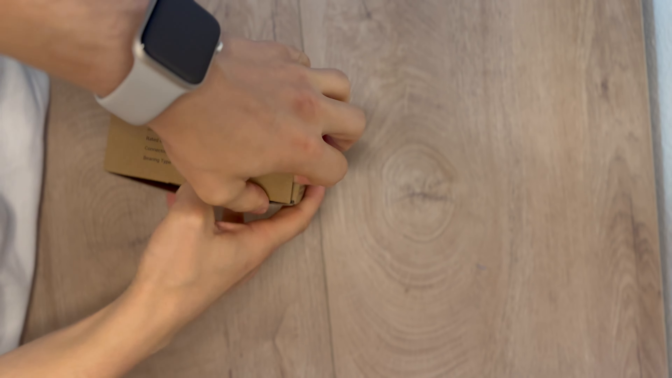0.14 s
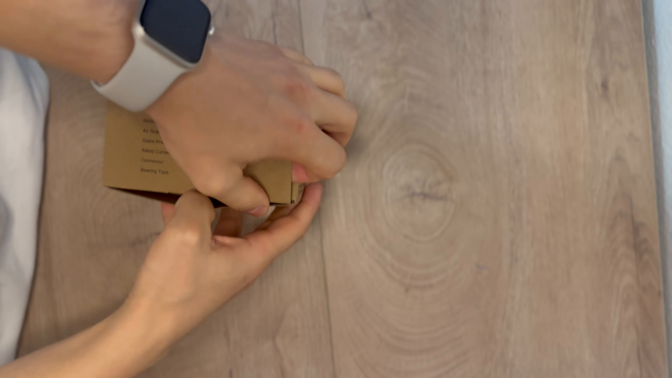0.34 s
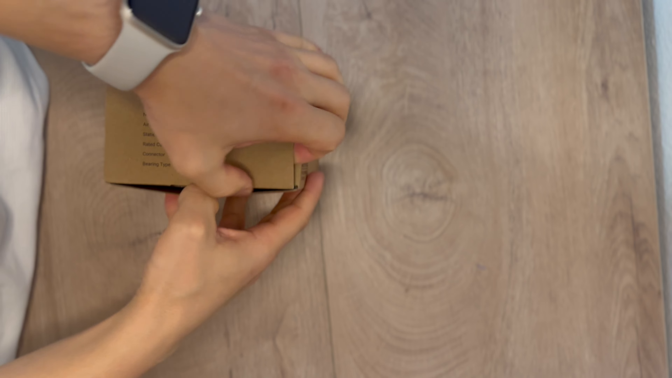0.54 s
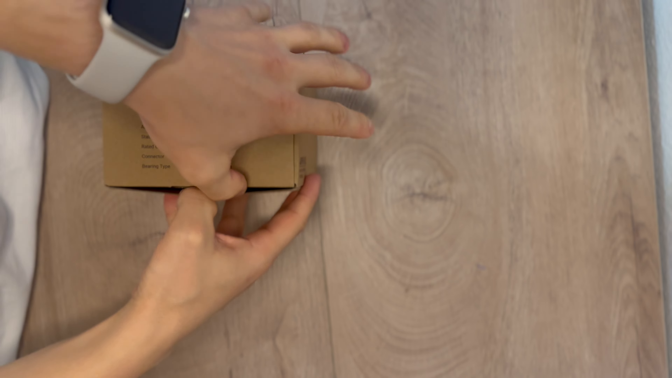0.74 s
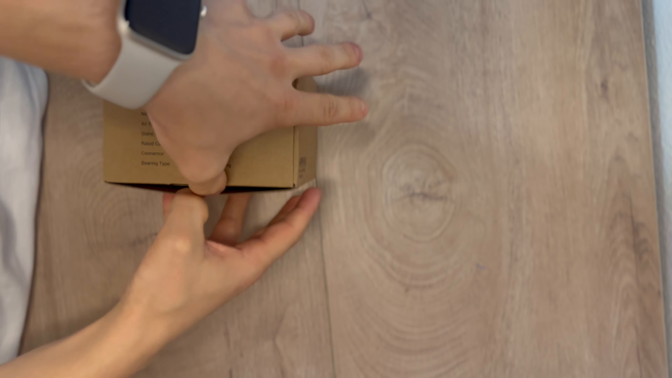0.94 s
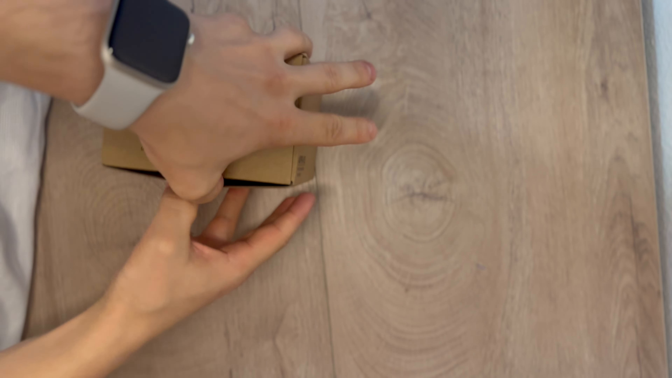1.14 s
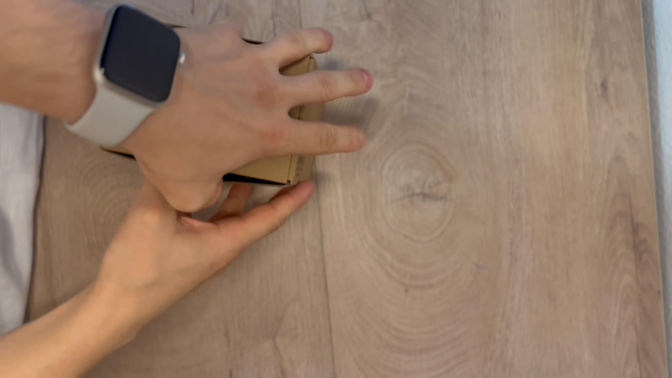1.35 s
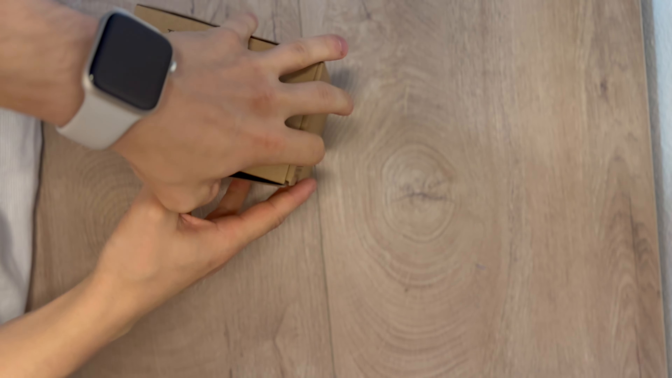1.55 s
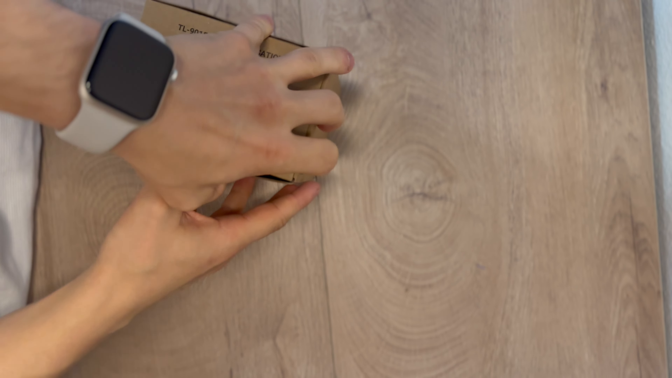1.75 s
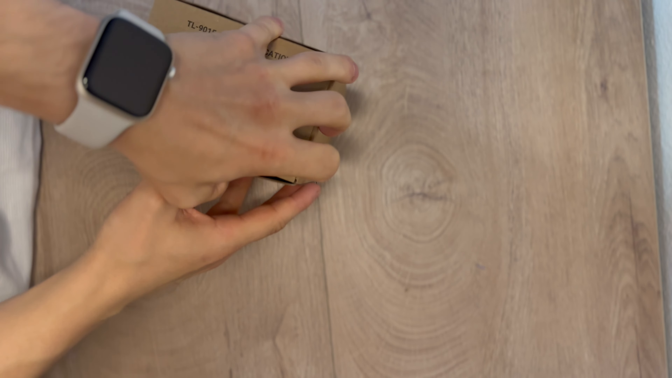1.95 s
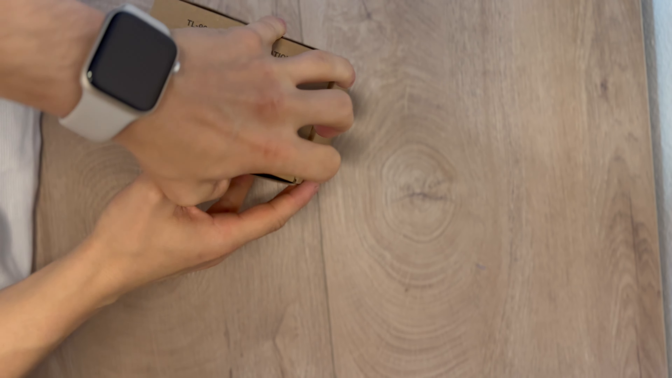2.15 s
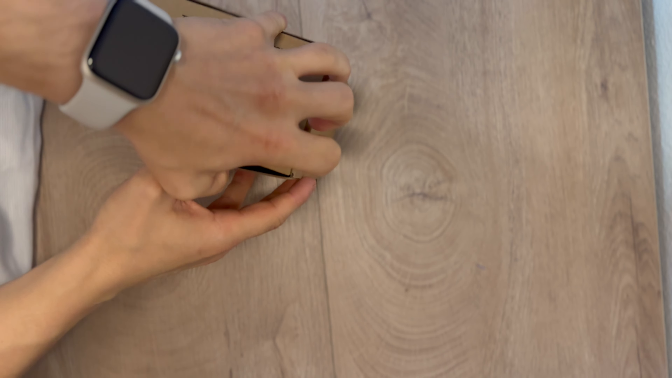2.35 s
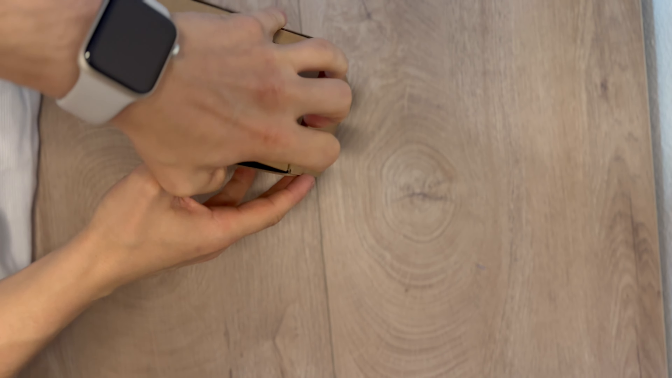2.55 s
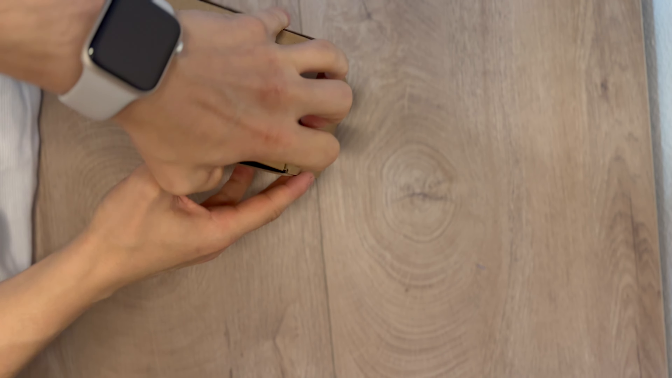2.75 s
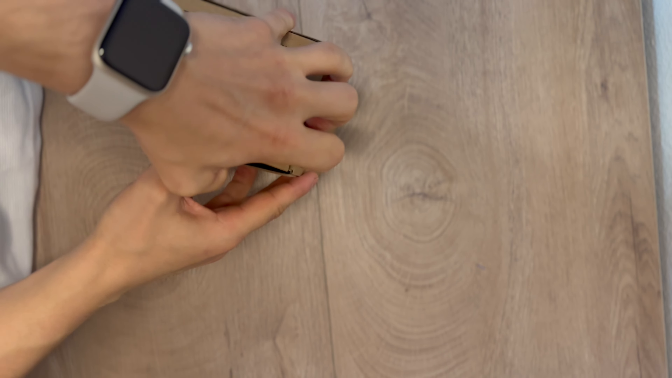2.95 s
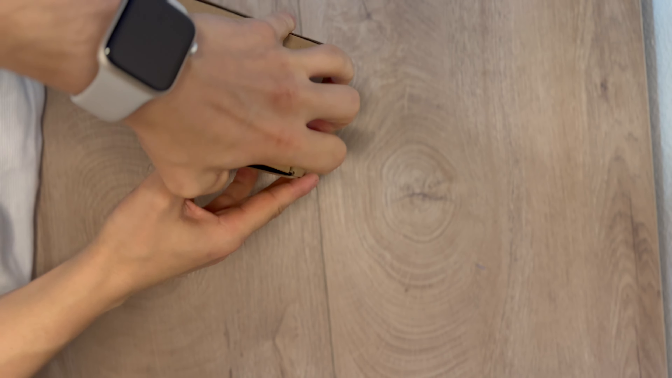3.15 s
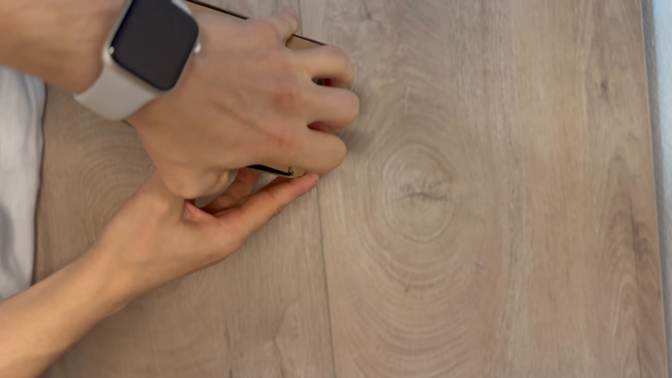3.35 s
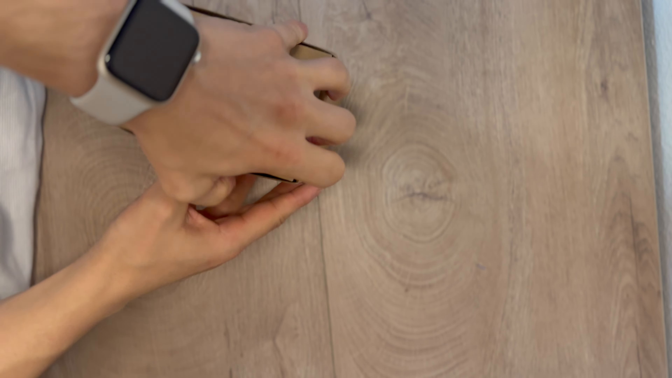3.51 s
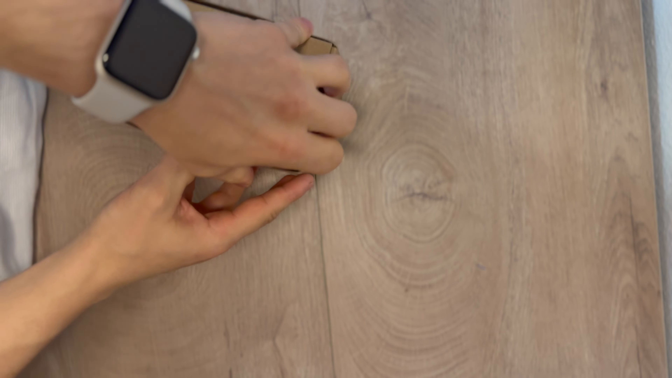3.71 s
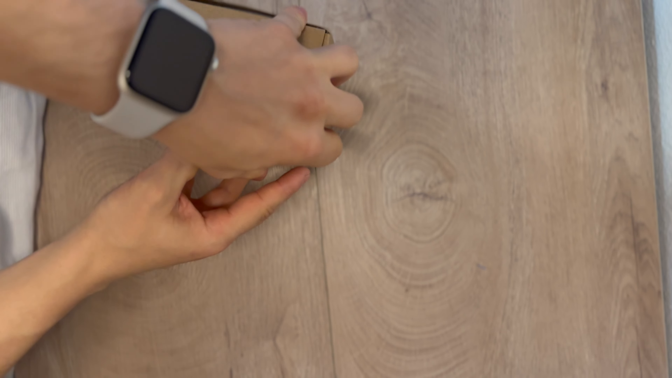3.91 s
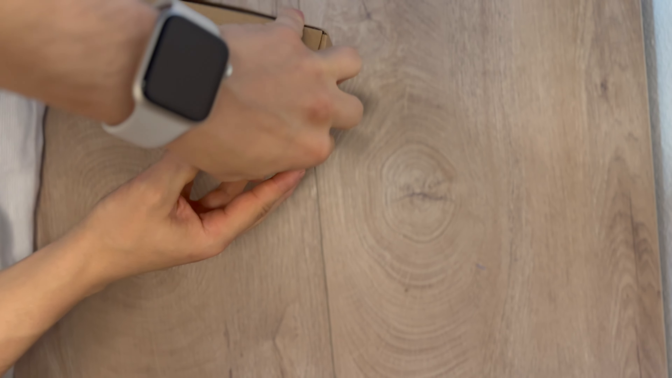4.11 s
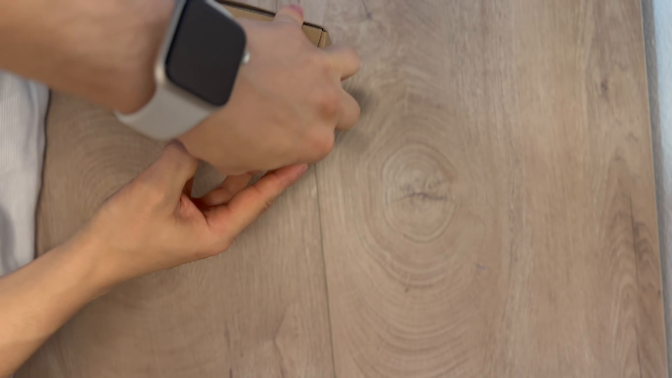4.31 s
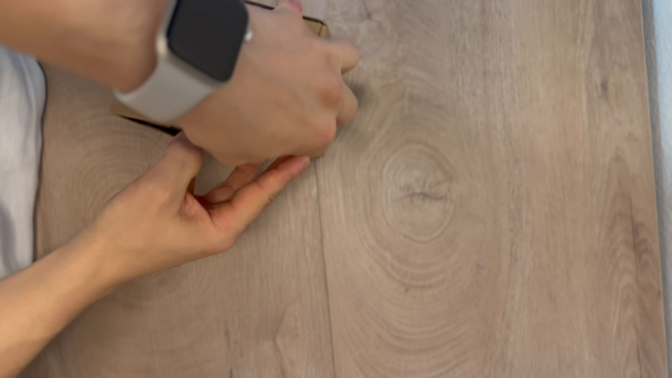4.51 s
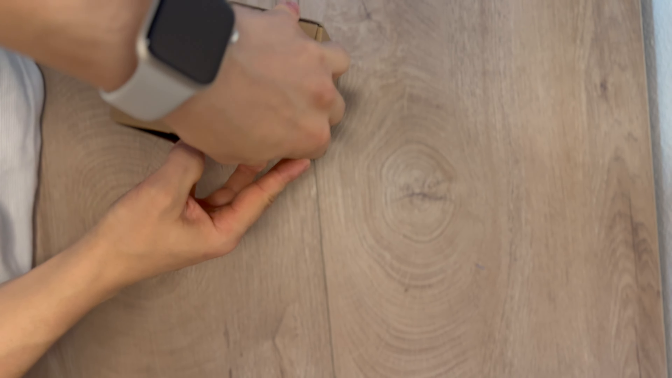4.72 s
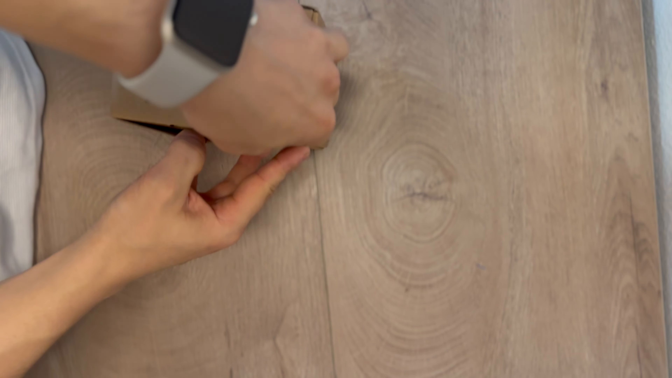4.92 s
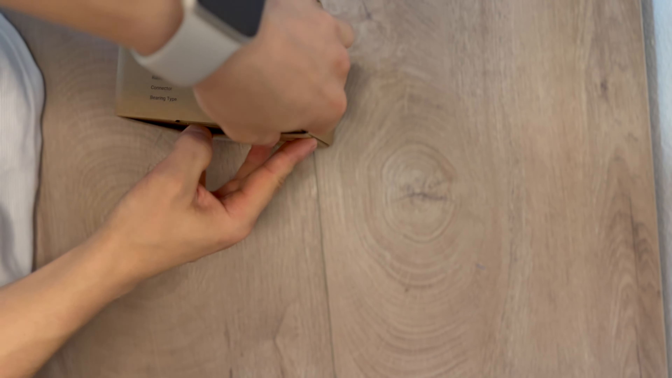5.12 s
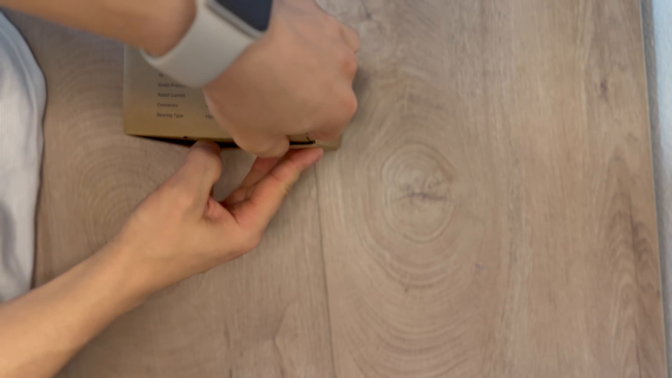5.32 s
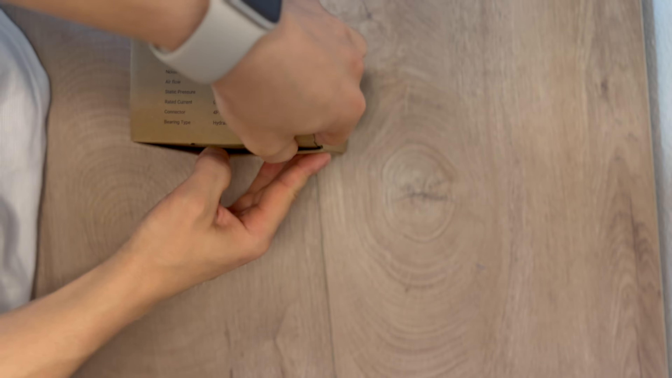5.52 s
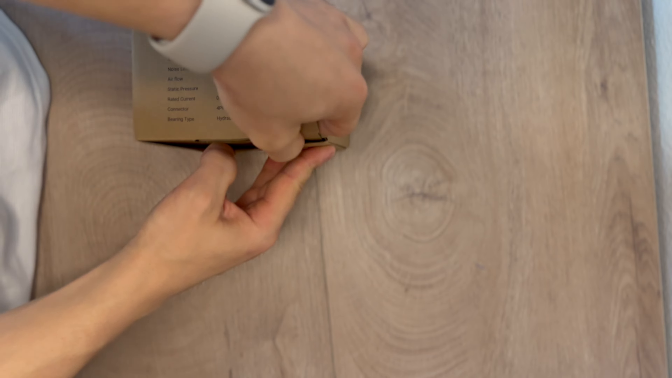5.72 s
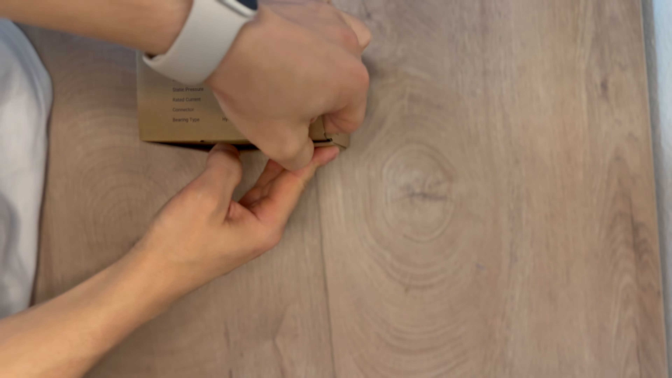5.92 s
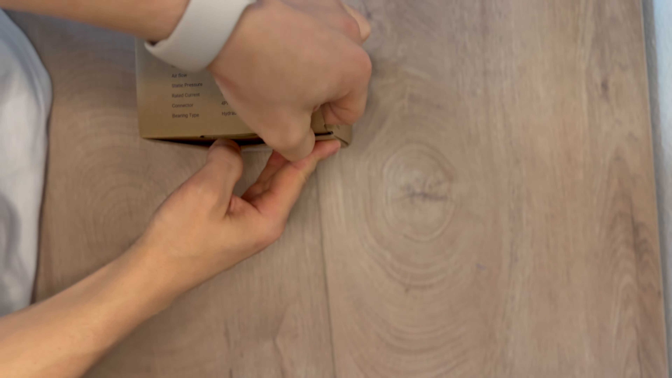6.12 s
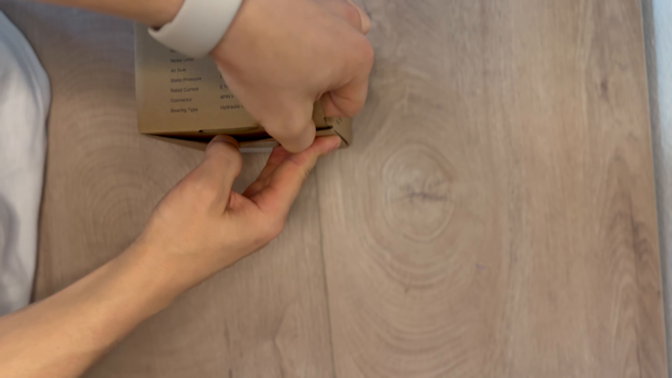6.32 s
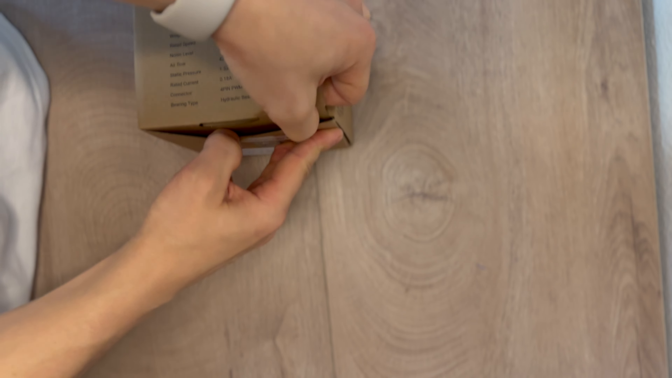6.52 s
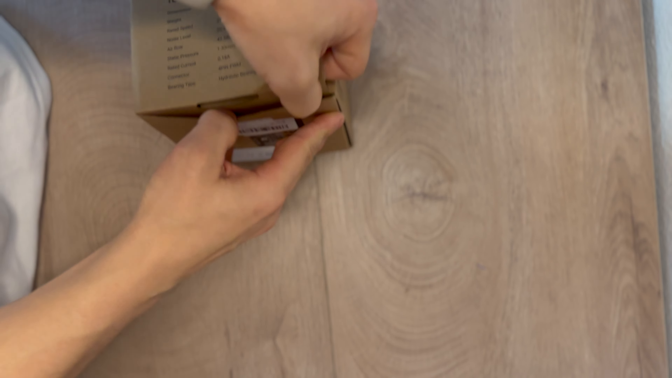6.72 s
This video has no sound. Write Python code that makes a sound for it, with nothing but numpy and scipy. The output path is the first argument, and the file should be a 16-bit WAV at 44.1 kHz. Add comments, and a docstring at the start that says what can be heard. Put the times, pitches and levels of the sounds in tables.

```python
"""Fingertips stroke a small cardboard box on a table and pick at its flap throughout, close to a pair of microphone ports.
Paper fibres catching make the rub and drag; bursts of breaking fibres make snaps, taps and nail ticks.
Fingertips stick and slip in chirping jerks, the flap groans, nails swish over the card, and pushes thump the box.
Near the end the flap drags free. A small live room answers with near echoes, a diffuse tail and a bass boom."""
import sys
import numpy as np
from scipy import signal
from scipy.fft import rfft, irfft, next_fast_len
from scipy.io import wavfile

SR = 44100
rng = np.random.default_rng(int(sys.argv[2]) if len(sys.argv) > 2 else 0)


def dump(signal):
    """Clip the signal to [-1, 1] and save it as 16-bit WAV at the path in sys.argv[1]."""
    limited = np.clip(np.atleast_2d(signal).T, -1, 1)
    pcm = np.round(limited * 32767).astype(np.int16)
    wavfile.write(sys.argv[1], SR, pcm)


N = 302557
TIME = np.arange(N) / SR
SIZE = next_fast_len(N + SR)  # transform length, with a second to spare for tails
HZ = np.fft.rfftfreq(SIZE, 1 / SR)

# card edges snapping past a nail: [t/s, crack level/dB, panel knock against crack/dB, edge tick against crack/dB,
# top treble of the tick/dB, length/s, ring of the struck spot f/Hz]
SNAPS = [(0.267, -19, 0.5, -1.5, 6, 0.0037, 1980), (0.3822, -29.5, 1.5, 4, 4, 0.0048, 2640),
         (0.3906, -29, 2.5, 4.5, 6, 0.0036, 1930), (0.562, -38.5, 2.5, 1, 4, 0.0033, 1260),
         (0.604, -32, 1.5, -2, 2, 0.0097, 1420), (0.624, -27, -11, -7, 1, 0.015, 1290),
         (0.6345, -22, -9, 2, 7, 0.0043, 3160), (1.415, -29.5, -11, -5, -1, 0.003, 2520),
         (1.661, -33.5, -1, -10, -1, 0.00086, 1780), (1.975, -38.5, -1, -2.5, -3, 0.0068, 1380),
         (2.44, -41, 0.5, 0, -2, 0.0038, 1440), (2.9813, -17, -12, -8, -7, 0.0025, 2000),
         (3.043, -27.5, -6.5, -5.5, 0, 0.0028, 1950), (3.0588, -27, -8, -5, -8, 0.0016, 2000),
         (3.1537, -24, -10, -13.5, -14, 0.0029, 1900), (3.206, -35, 2, -4, -8, 0.004, 1770),
         (3.362, -34.5, -5, 1.5, 4, 0.004, 2370), (3.394, -36, -7, -12, 7, 0.0021, 2500),
         (3.4127, -34, -14, -3.5, 0, 0.0055, 2460), (3.5355, -17, -16, -3, 7.5, 0.0057, 1730),
         (3.541, -18, -18, -3.5, -5, 0.0065, 1400), (4.017, -34.5, 6.5, -5.5, -3, 0.013, 2370),
         (4.529, -39.5, 0.5, -6, -8.5, 0.0027, 1890), (4.643, -37, 1, -7.5, -4, 0.0038, 1950),
         (4.857, -40, -16, 11.5, 3, 0.0015, 2030), (4.899, -27, -17, 3, 5.5, 0.0013, 1900),
         (5.177, -22, -1, 1, 1.5, 0.0047, 2130), (5.4259, -33.5, -0.5, -7, 3, 0.0027, 2000),
         (5.632, -37, -13.5, 7, 4.5, 0.0046, 1930), (6.3345, -31, -2.5, 9.5, 3, 0.0014, 2300),
         (6.3359, -24, -1, 7.5, 7.5, 0.0026, 2380), (6.361, -24.5, -2, 3, 8, 0.0033, 3020),
         (6.568, -37, 9, -1.5, 7, 0.0045, 1190), (6.689, -38.5, 7, -8, 12, 0.0065, 1380),
         (6.7145, -20.5, 0, -14, 6, 0.0091, 1340), (6.729, -25.5, 4, -9, -3, 0.0054, 2820),
         (6.741, -23.5, -4, -6.5, 7, 0.0058, 3080)]
# width of the sound field: [f/Hz, side against mid level/dB, before any lift in room()]
SIDE_AGAINST_MID = [(150, -24), (300, -15), (650, -2.5), (1200, -9.5), (2400, -6), (5000, -5), (9000, -9)]


def amp(db):
    """Decibels to amplitude."""
    return 10 ** (np.asarray(db) / 20)


def unit(x):
    """Scale to an RMS of one."""
    return x / np.sqrt(np.mean(x ** 2) + 1e-20)


def read(points, hz):
    """A table over log frequency, joined by straight lines."""
    f, value = np.transpose(points)
    return np.interp(np.log(hz + 1), np.log(f + 1), value)


def add(mix, s, sound):
    """Lay a sound into the mix at s seconds."""
    part = mix[max(round(s * SR), 0):][:len(sound)]
    part += sound[:len(part)]


def shape(x, response):
    """Filter by a frequency response."""
    return irfft(rfft(x, SIZE) * response, SIZE)[..., :N]


def band(hz, lo_hz, hi_hz, order=8):
    """Gain of a smooth band between two corners."""
    return 1 / np.sqrt((1 + (lo_hz / (hz + 1)) ** order) * (1 + (hz / hi_hz) ** order))


def causal(gain):
    """The response of that gain which rings only after it is struck."""
    cepstrum = irfft(np.log(np.maximum(gain, 1e-5)))
    half = len(cepstrum) // 2
    cepstrum[1:half] *= 2
    cepstrum[half + 1:] = 0
    return np.exp(rfft(cepstrum))


def wander(rate_hz):
    """A smooth random curve of unit RMS."""
    return unit(shape(rng.standard_normal(N), band(HZ, rate_hz / 5, rate_hz)))


def panel(hz):
    """Gain of the cardboard's resonances, each a peak over frequency."""
    # panel resonances: [f/Hz, width/Hz, level/dB]
    resonances = [(640, 7.7, 4.5), (750.4, 26, 3.5), (826, 93, 4.5), (1343, 320, 4), (1790, 460, 0),
                  (2284, 46, 4.5), (2750, 29, 5.5), (2790, 140, 0), (5930, 590, 6), (7060, 1600, 4)]
    return amp(sum(db / (1 + (2 * (hz - f) / width) ** 2) for f, width, db in resonances))


def bending(hz, lag, knee_hz):
    """Bending waves run faster when short: the treble arrives first and each blow chirps downward."""
    return np.exp(-2j * np.pi * lag * knee_hz * np.log(1 + hz / knee_hz))


def strike(force, responses, levels_db, size=4096):
    """A force rings each band of the card; levels are energies spread over 4 ms."""
    spread = np.sqrt(.004 * SR / size)
    spectrum = rfft(force, size)
    return spread * sum(amp(db) * unit(irfft(spectrum * r)) for r, db in zip(responses, levels_db))


def stillness():
    """The low hush of the room: steady coloured noise, with its own width."""
    # colour of the hush: [f/Hz, relative level/dB]
    hush = [(15, -20.5), (35, -2.5), (135, -1), (270, -9.5), (1000, -33), (3000, -34), (7000, -42.5),
            (11000, -63)]
    mid, side = shape(rng.standard_normal((2, N)), amp(read(hush, HZ)))
    side = shape(side, amp(read(SIDE_AGAINST_MID, HZ)))
    return amp(-53.5) * unit(np.array([mid + side, mid - side]))


def friction(levels, grains_per_s, grain_db, smooth, clump_db, lowest_hz):
    """Paper fibres catch in clumps; the catches drive rumble and rasp, and fine sliding smooths the hiss."""
    # colour of rubbed card: [f/Hz, relative level/dB]
    rub_colour = [(40, 7.5), (95, 1.5), (140, 14.5), (225, 10), (310, 13), (480, 2.5), (1000, -4),
                  (1450, -6.5), (2050, -6), (2600, -8), (3800, -13), (5100, -20), (6200, -21.5),
                  (7900, -18.5), (9200, -21), (11500, -36.5), (15500, -24.5)]
    sizes = amp(grain_db * np.minimum(rng.exponential(1, N), 4)) * rng.choice([-1, 1], N)
    catches = unit(sizes * (rng.random(N) < grains_per_s / SR))
    sliding = smooth * rng.standard_normal(N)
    clumps = amp(clump_db * np.tanh(wander(rate_hz=18.8)))
    contact = catches + sliding
    forces = [np.sqrt(clumps) * contact, clumps * contact, clumps * (contact + sliding)]
    colour = amp(read(rub_colour, HZ)) * panel(HZ)
    # rumble, rasp, hiss
    bands = [band(HZ, lowest_hz, 410), band(HZ, 249.3, 3390), band(HZ, 2165, 17000)]
    chirp = bending(HZ, lag=0.00883, knee_hz=248.5)
    return sum(level * unit(shape(force, causal(colour * b) * chirp))
               for level, force, b in zip(levels, forces, bands))


def rubbing():
    """Skin creeps over the card stroke by stroke, the card settles after each snap, and the grip shifts."""
    # fingers stroking the card: [start t/s, length/s, rasp level/dB, hiss against rasp/dB]
    strokes = [(-0.04, 0.29, -42, -7), (0.377, 0.092, -43, -3.5), (0.69, 0.67, -48.5, -5.5),
               (1.203, 0.03, -43.5, -5), (1.326, 0.094, -42, -8), (1.485, 0.19, -47.5, -2.5),
               (1.732, 0.31, -49, -12), (2.083, 0.07, -53, -8.5), (2.196, 0.085, -48.5, -16),
               (2.298, 0.072, -46, -9), (2.634, 0.23, -54.5, -16), (3.342, 0.035, -42, -5),
               (3.446, 0.054, -43, -8), (3.679, .13, -48.5, -6.5), (3.842, 0.38, -47.5, -8.5),
               (4.283, 0.36, -54, -16.5), (4.625, 0.15, -51, -6), (4.845, 0.036, -58.5, 8),
               (4.947, 0.24, -51.5, -12.5), (5.246, 0.18, -47, -11), (5.611, 0.17, -50.5, -7),
               (5.937, 0.44, -55, -16.5), (6.555, 0.75, -54, 1)]
    # the grip shifting on the box: [t/s, rumble level/dB, lowered by 7 dB below]
    grip = [(0.0, -58.5), (0.61, -54), (0.78, -34), (0.9, -40.5), (1.34, -38), (1.7, -52.5), (2.79, -46.5),
            (2.88, -49), (3.9, -36.5), (4.05, -26.5), (4.32, -40), (5.1, -42), (5.39, -51), (6.02, -63),
            (6.48, -43), (6.65, -34), (6.74, -43), (6.86, -31)]
    attack_s, release_s = 0.037, 0.034
    # fingers that only hold the box
    rasp, hiss = np.full(N, amp(-66)), np.full(N, amp(-76.5))
    for start, length, db, hiss_db in strokes:
        t = TIME - start
        speed = np.clip(t / attack_s, 0, 1) * np.exp(-np.clip((t - length) / release_s, 0, 20))
        rasp += amp(db) * speed
        hiss += amp(db + hiss_db) * speed
    # the panel rumbles 1 dB above the rasp of a stroke
    rumble = amp(np.interp(TIME, *np.transpose(grip)) - 7) + amp(1) * rasp
    # the bent card rustles as it settles after each snap
    settle_rasp_db, settle_hiss_db, settle_db_per_s = -21.5, -29, 221.5
    settling = amp(-settle_db_per_s * TIME[:SR])
    for s, db, _, tick_db, *_ in SNAPS:
        add(rasp, s, amp(db + settle_rasp_db) * settling)
        add(hiss, s, amp(db + tick_db + settle_hiss_db) * settling)
    return friction([rumble, rasp, hiss], grains_per_s=800, grain_db=5.5, smooth=0.58,
                    clump_db=6.0, lowest_hz=44.5)


def drags():
    """The flap grinds along its slot, card against card, tightens and lets go."""
    # drags: [start t/s, full pressure due t/s, let go t/s, rasp level/dB, rumble level/dB];
    # where it lets go before full pressure is due, the rise is cut off part way
    pulls = [(0.147, 0.252, 0.32, -30, -33.5), (0.546, 0.637, 0.59, -28, -26),
             (1.098, 1.11, 1.19, -40.5, -35.5), (5.139, 5.181, 5.29, -36, -33),
             (6.316, 6.331, 6.39, -33.5, -33), (6.511, 6.59, 6.66, -31.5, -30),
             (6.707, 6.721, 6.8, -19, -24)]
    hiss_db = -7  # against the rasp
    levels = np.zeros((3, N))
    for start, full_due, let_go, rasp_db, rumble_db in pulls:
        pressure = np.interp(TIME, [start, full_due, let_go], [0, 1, 0]) ** 1.08
        levels += amp([rumble_db, rasp_db, rasp_db + hiss_db])[:, None] * pressure
    return friction(levels, grains_per_s=1800, grain_db=1.0, smooth=0.29, clump_db=2.0, lowest_hz=87)


def snaps(size=4096):
    """Fibres creep, then give way within a few milliseconds; the struck spot rings and the panel is knocked."""
    # colour of a snap: [f/Hz, relative level/dB]
    snap_colour = [(150, 14), (450, 6.5), (700, -1), (1100, 6.5), (1400, -0.5), (2100, 1.5), (2600, -3.5),
                   (3300, -2.5), (4800, 2.5), (6000, 3), (7500, 4), (9000, 3.5), (11000, 2), (13000, -12),
                   (15500, 2.5)]
    # fingertips landing on the lid, a dull knock with a bright tick: [t/s, tick level/dB]
    taps = [(0.165, -31), (0.198, -30.5), (0.737, -38.5), (1.214, -39.5), (1.301, -30), (1.3457, -30),
            (1.361, -26.5), (1.39, -37), (1.522, -29), (1.5622, -35), (1.6184, -34), (1.639, -29),
            (1.862, -34), (1.901, -30.5), (4.8709, -41.5), (4.887, -38), (5.208, -35), (6.638, -48)]
    # a nail catching lightly on the edge of the flap: [t/s, crack level/dB, ring of the spot f/Hz]
    nail_catches = [(0.356, -41.5, 1200), (2.297, -47, 1680), (2.337, -45, 1900), (2.3738, -44, 1300),
                    (2.611, -51, 2020), (2.7895, -52, 1730), (3.353, -42, 2400), (3.379, -34.5, 1900),
                    (3.404, -43, 1710), (3.8374, -43.5, 2000), (3.872, -40, 1480), (3.9914, -43, 2200),
                    (4.1007, -38.5, 1490), (5.15, -36.5, 1820), (5.345, -45, 1900), (6.549, -37.5, 1240),
                    (6.702, -34.5, 1000)]
    lead = .012  # s of creep before the break
    hz, t, out = np.fft.rfftfreq(size, 1 / SR), np.arange(size) / SR - lead, np.zeros(N)
    colour = amp(read(snap_colour, hz))
    # knock, crack, tick
    bands = [band(hz, 300, 1050, order=12), band(hz, 1300, 4100, order=14), band(hz, 4300, 17000)]
    chirp = bending(hz, lag=0.00716, knee_hz=245.3)
    knock, crack, tick = (causal(colour * b) * chirp for b in bands)
    creep = amp(-37.0) * np.exp(-abs(t) / 0.0062)
    push = 3 * signal.unit_impulse(size, round((lead + 0.00057) * SR))
    # each blow: t/s, knock, crack, tick and top treble levels/dB, length/s, ring f/Hz
    edges = [(s, db + knock_db, db, db + tick_db, *rest) for s, db, knock_db, tick_db, *rest in SNAPS]
    tips = [(s, db - 7, db - 11.5, db, 4, 0.0034, 1330) for s, db in taps]
    nails = [(s, db - 1.5, db, db - 7, -2.5, 0.0029, ring_hz) for s, db, ring_hz in nail_catches]
    for s, knock_db, crack_db, tick_db, top_db, length, ring_hz in edges + tips + nails:
        u = np.clip(t / max(length, 1e-3), 0, 20)
        breaking = u * np.exp(-(u / 0.61) ** 2)
        crackle = rng.standard_normal(size) * amp(8.8 * rng.standard_normal(size))
        fibres = crackle * (creep + breaking)
        # the struck spot stands out by 10.5 dB, 280 Hz to half its decibels
        spot = causal(amp(10.5 / (1 + ((hz - ring_hz) / 280) ** 2)))
        # the crack reaches less high when the tick is weak: 337 Hz per dB
        reach_hz = max(5400 + 337 * (tick_db - crack_db), 2620)
        spot *= causal(band(hz, 0, reach_hz, order=4))
        edge = causal(amp(top_db * band(hz, 8000, SR, order=24)))  # top treble lies above 8 kHz
        flexed = causal(panel(hz * rng.uniform(0.92, 1.05)))  # the grip bends the panel and shifts its resonances
        add(out, s - lead, strike(fibres, [crack * spot * flexed, tick * edge * flexed], [crack_db, tick_db]))
        add(out, s - lead, strike(fibres + push, [knock * flexed], [knock_db]))
    return out


def groans():
    """The flap judders in its slot, sticking and slipping into a low hollow tone which sags as it binds."""
    # groans: [start t/s, loudest t/s, end t/s, level/dB, starting rate f/Hz]
    judders = [(0.186, 0.248, 0.27, -25.5, 300.8), (6.555, 6.587, 6.625, -28, 170)]
    bound_hz, sag_s, jitter = 139, 0.032, 0.036  # the rate it sags to, how soon, and how uneven
    body_hz = 424  # the panel passes the overtones up to here
    out = np.zeros(N)
    for start, loudest, end, db, from_hz in judders:
        t = np.arange(start, end, 1 / SR)
        hz = bound_hz + (from_hz - bound_hz) * np.exp(-((t - start) / sag_s) ** 2)
        uneven = 1 + jitter * wander(rate_hz=bound_hz)[:len(t)]
        turns = np.cumsum(hz * uneven) / SR
        tone = np.zeros(len(t))
        for k in range(1, 10):
            level = band(k * hz, 0, body_hz, order=4) / np.sqrt(k)
            tone += level * np.sin(2 * np.pi * (k * turns + rng.random()))
        add(out, start, amp(db) * unit(tone) * np.interp(t, [start, loudest, end], [0, 1, 0]))
    return out


def thumps():
    """The box is pushed against the table; the hand damps it within a few cycles as the pitch sags."""
    # soft pushes: [t/s, peak of the swell/dB, nominal pitch f/Hz]
    pushes = [(0.578, -24, 207), (0.613, -22.5, 180), (1.1156, -16, 187), (1.134, -19, 168),
              (1.982, -29, 209), (2.442, -29, 236), (2.9834, -14.5, 247), (3.051, -21.5, 201),
              (3.171, -24, 198), (3.482, -16.5, 214), (3.559, -26, 151), (4.087, -30, 180),
              (4.171, -25, 163), (4.531, -28, 227), (4.647, -21.5, 202), (4.95, -28, 216),
              (5.1823, -19, 305), (5.207, -25.5, 286), (5.435, -25.5, 185), (0.635, -28.5, 252),
              (6.72, -11.5, 199), (6.744, -11, 191)]
    out, t = np.zeros(N), np.arange(SR // 10) / SR
    for s, db, hz in pushes:
        turns = hz * 1.495 * t / (1 + t / 0.023)  # starts at 1.495 times the nominal pitch
        swell = t * hz / 0.66
        add(out, s, amp(db) * swell * np.exp(1 - swell) * np.sin(2 * np.pi * turns))
    return out


def jerks():
    """A stuttering finger sticks and lets go at a nearly even pace, weakening as it goes: (s, knock dB, crack dB)."""
    # a fingertip stuttering over a panel, the shortest runs being one jerk:
    # [start t/s, length/s, first knock level/dB, sharpness as crack against knock/dB]
    stutters = [(0.736, 0.036, -21, -14.5), (0.797, .025, -25.5, -15.5), (0.833, .027, -27.5, -17),
                (0.8636, .042, -24, -15), (0.93, 0.017, -28.5, -17.5), (1.0797, .025, -29, -27),
                (1.1157, 0.034, -31, -30), (1.274, .01, -35.5, -7.5), (2.515, .01, -41.5, -12.5),
                (2.6845, .01, -41, -13), (2.839, 0.029, -39, -9), (3.096, .01, -33, -7.5),
                (3.179, .01, -30, -8.5), (3.8885, .04, -35, -9.5), (4.076, 0.035, -29, -10.5),
                (4.166, .01, -32.5, -8.5), (4.194, .025, -31, -9), (4.945, 0.035, -36, -7.5),
                (5.308, .01, -38.5, -0.5), (5.334, .045, -38.5, -8), (5.408, .01, -40, -7),
                (5.5938, .01, -40, -4.5), (5.643, 0.073, -37, -9), (5.9707, .01, -38, 0.5),
                (6.002, .025, -41.5, 0), (6.049, 0.02, -40, -2.5), (6.081, .01, -39, -9),
                (6.103, .025, -43, -6)]
    gap_s, jitter_s = .0155, 0.0008  # time it sticks between jerks, and how uneven that is
    # a run tires; its jerks vary slightly in strength and sharpness
    fade_db, scatter_db, sharpness_scatter_db = 6, -0.5, 1
    for start, length, strength_db, sharpness_db in stutters:
        for after in np.arange(0, length, gap_s):
            late, harder, sharper = rng.standard_normal(3) * (after > 0)
            db = strength_db - fade_db * after / length + scatter_db * harder
            yield start + after + jitter_s * late, db, db + sharpness_db + sharpness_scatter_db * sharper


def slips(size=4096):
    """A fingertip lets go in one gritty jerk, which the panel turns into a falling chirp; stiffer spots sound higher."""
    hz, t, out = np.fft.rfftfreq(size, 1 / SR), np.arange(size) / SR, np.zeros(N)
    for s, knock_db, crack_db in jerks():
        jerk = signal.unit_impulse(size, round(0.00042 * SR))
        grit = rng.standard_normal(size) * np.exp(-t / 0.0024)  # loose fibres
        stiffness = rng.uniform(0.862, 1.113)
        # a sharp jerk reaches 5400 Hz, a duller one an octave less per 9.5 dB
        reach_hz = 5400 * 2 ** (np.clip(crack_db - knock_db, -18, 0) / 9.5)
        low = band(hz / stiffness, 220, 533, order=8)
        high = band(hz, 900, 2170, order=4) * band(hz, 690, reach_hz, order=20)
        chirp = bending(hz, lag=0.00855 / stiffness, knee_hz=231)
        knock, crack = (causal(b * panel(hz)) * chirp for b in (low, high))
        add(out, s, strike(jerk + 0.072 * grit, [knock], [knock_db]))  # the low knock is nearly clean
        add(out, s, strike(jerk + 0.25 * grit, [crack], [crack_db]))
    return out


def swishes():
    """Fine grains under a sliding nail ring a broad hollow resonance, which shifts along the stroke."""
    # a nail skimming the card: [start t/s, fastest t/s, end t/s, level/dB, from f/Hz, to f/Hz, width/Hz];
    # a row that ends before it starts is silent
    skims = [(0.86, 0.994, 1.11, -53.5, 2240, 2870, 1300), (0.898, 1.02, 1.22, -57, 3940, 4470, 1100),
             (1.508, 1.595, 1.9, -54, 7140, 6640, 1500), (2.103, 2.117, 2.15, -49.5, 2030, 1650, 1220),
             (4.65, 4.722, 4.96, -58.5, 2090, 1800, 700), (4.65, 4.756, 4.85, -59.5, 6840, 7060, 1500),
             (4.956, 5.07, 5.26, -57.5, 1720, 2100, 900), (6.54, 6.56, 6.53, -32.5, 850, 990, 200)]
    out = np.zeros(N)
    for start, fastest, end, db, from_hz, to_hz, width_hz in skims:
        t = np.arange(start, end, 1 / SR)
        grains = rng.standard_normal(len(t)) * amp(5.8 * rng.standard_normal(len(t)))
        turn = np.exp(2j * np.pi * np.cumsum(np.linspace(from_hz, to_hz, len(t))) / SR)
        # shift the moving resonance down to zero, low-pass there, and shift back
        lowpass = signal.butter(2, width_hz / 2, fs=SR)
        ring = (turn * signal.lfilter(*lowpass, grains / turn)).real
        speed = np.interp(t, [start, fastest, end], [0, 1, 0])
        add(out, start, amp(db) * unit(ring) * np.sqrt(speed))
    return out


def room(x, tail_db, early_db, boom_db):
    """Near echoes from table and hands, a diffuse tail and, below it, the room's bass modes."""
    # reverberation: [f/Hz, t60/s]
    room_t60 = [(150, 0.37), (500, 0.18), (2000, 0.16), (7000, 0.2), (12000, 0.043), (15500, 0.15)]
    # low modes of the room: [f/Hz, level/dB before boom_db, t60/s]
    modes = [(122, -1, .55), (146, 2, .55), (190, 1.5, .5), (300, -1.5, .32), (369, -4.5, .25),
             (623, -2, .25), (779, -4.5, .25)]
    t = np.arange(SR * 3 // 4) / SR
    hz, at, z = signal.stft(rng.standard_normal((2, len(t))), SR, nperseg=256)
    decay = amp(-60 * at / read(room_t60, hz)[:, None])
    tails = signal.istft(z * decay, SR, nperseg=256)[1][:, :len(t)]
    tails *= np.clip((t - .003) / 0.0055, 0, 1)
    echoes = rng.choice([-1, 1], tails.shape) * (rng.random(tails.shape) < 6000 / SR)
    early = echoes * np.exp(-t / 0.004) * (t > .002)
    mid, side = (amp(tail_db) * a / np.linalg.norm(a) + amp(early_db) * b / np.linalg.norm(b)
                 for a, b in zip(tails, early))
    boom = sum(amp(db - 60 * t / t60) * np.sin(2 * np.pi * f * t) * 2 * np.log(1000) / (t60 * SR)
               for f, db, t60 in modes)
    answer = rfft(mid, SIZE) * causal(band(HZ, 230, SR, order=4)) + amp(boom_db) * rfft(boom, SIZE)
    centre = x + shape(x, answer)
    width = shape(x, rfft(side, SIZE) * amp(read(SIDE_AGAINST_MID, HZ) + 5.0))  # sides lifted by 5 dB
    return np.array([centre + width, centre - width])


def scene():
    """Blows and strokes on the box, each answered by the room, over the room's hush."""
    blows = room(snaps() + slips() + thumps(), tail_db=-12.0, early_db=-11.5, boom_db=5.5)
    strokes = room(rubbing() + drags() + groans() + swishes(), tail_db=-9.0, early_db=-8.5, boom_db=4.5)
    return blows + strokes + stillness()


def record(dry):
    """The two close microphone ports hear the treble out of step; then the band limit."""
    # between the two ports: [f/Hz, left leads by/rad]
    port_phase = [(100, 0), (4000, .1), (4800, .9), (5400, -.3), (7000, -1.2), (9700, -2.6), (11000, -3.05),
                  (14000, -3.5), (16000, -4.4)]
    turn = np.exp(.5j * read(port_phase, HZ))
    ports = shape(dry, np.array([turn, 1 / turn])) * amp([[-.2], [.2]])
    lowpass = signal.firwin(255, 16300, window=("kaiser", 9), fs=SR)
    return signal.oaconvolve(ports, lowpass[None], "same")


dry = scene()
out = record(dry)
dump(out)
```